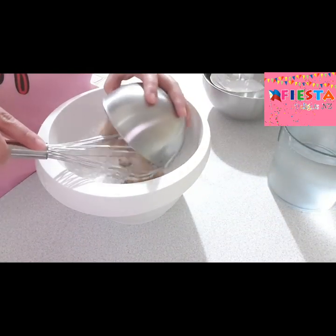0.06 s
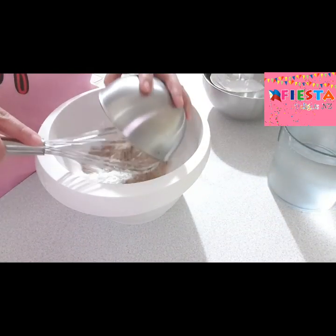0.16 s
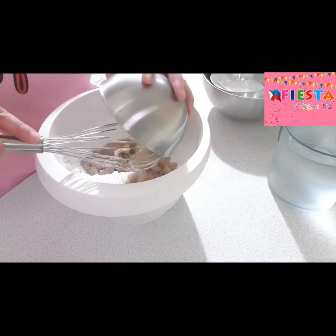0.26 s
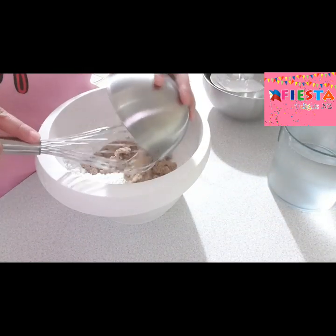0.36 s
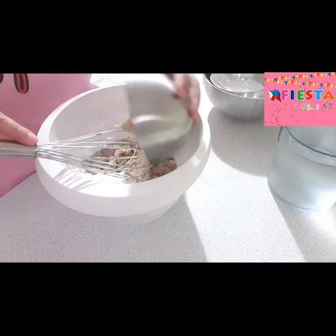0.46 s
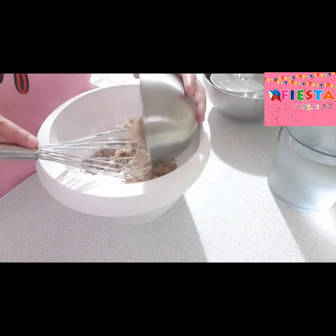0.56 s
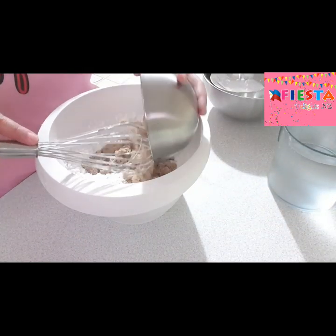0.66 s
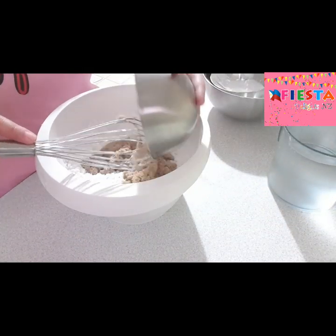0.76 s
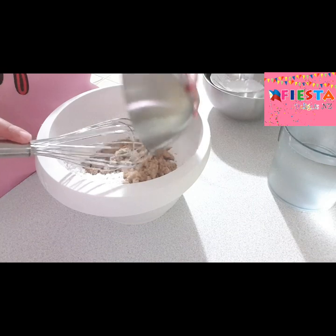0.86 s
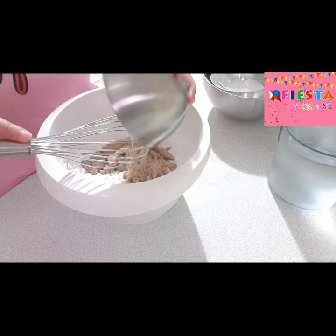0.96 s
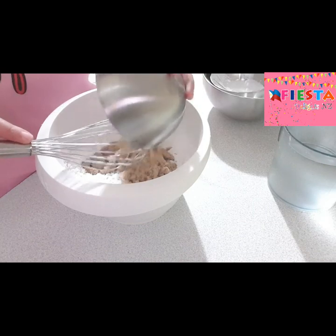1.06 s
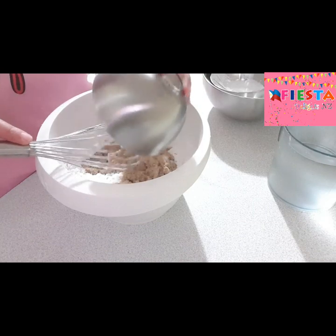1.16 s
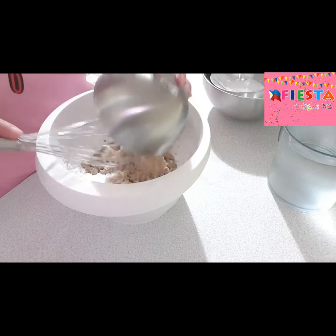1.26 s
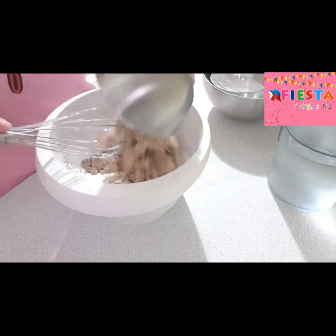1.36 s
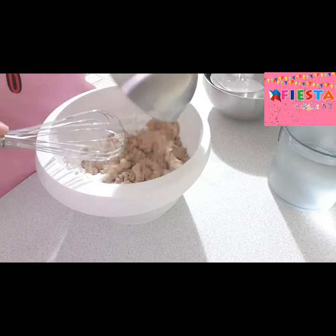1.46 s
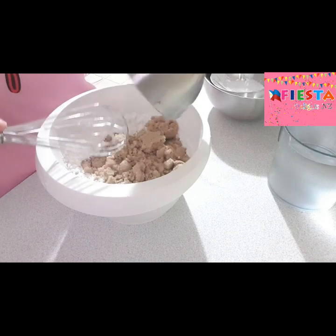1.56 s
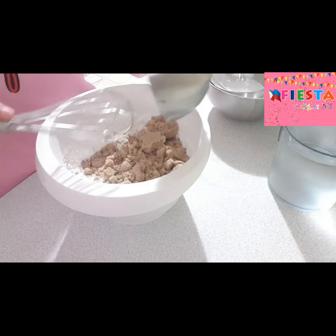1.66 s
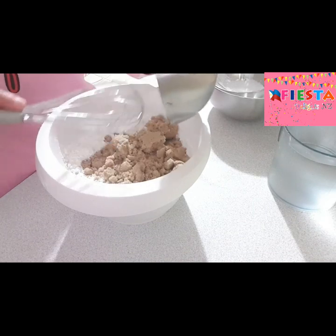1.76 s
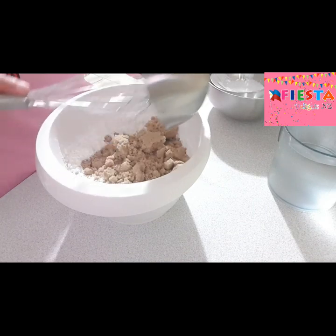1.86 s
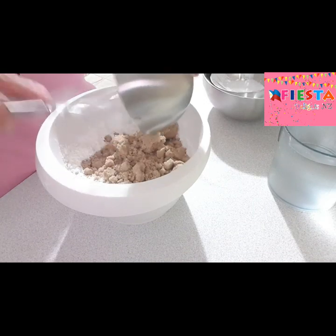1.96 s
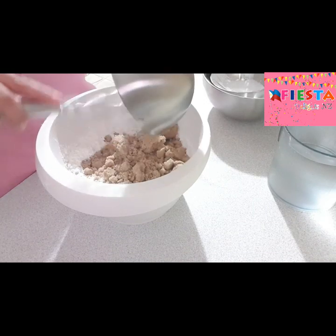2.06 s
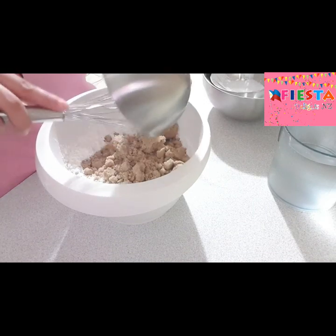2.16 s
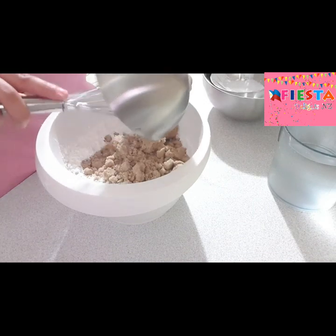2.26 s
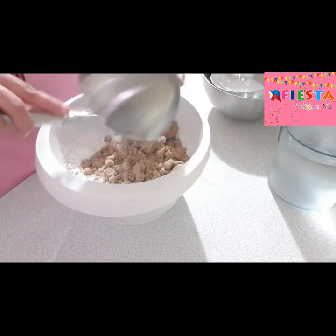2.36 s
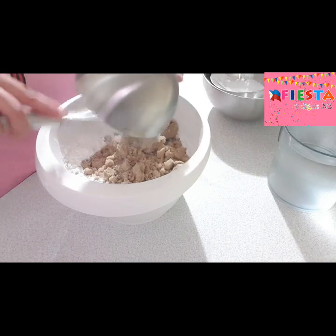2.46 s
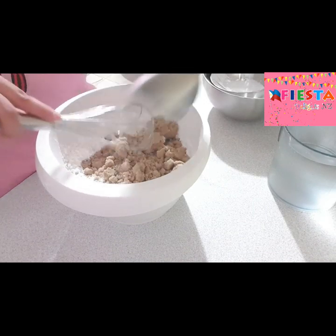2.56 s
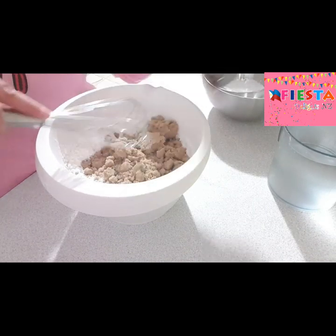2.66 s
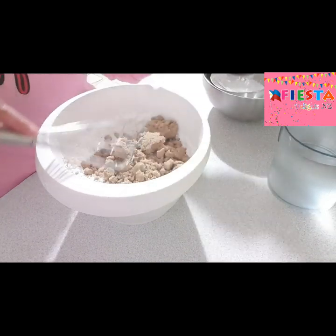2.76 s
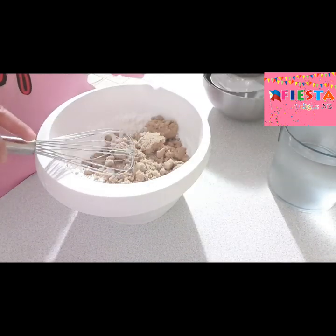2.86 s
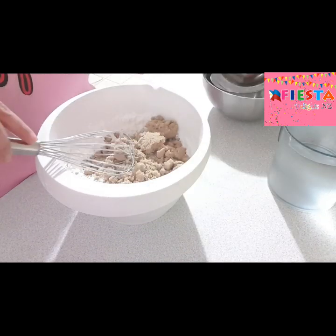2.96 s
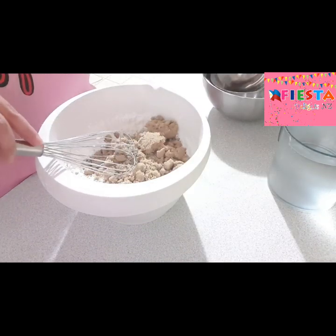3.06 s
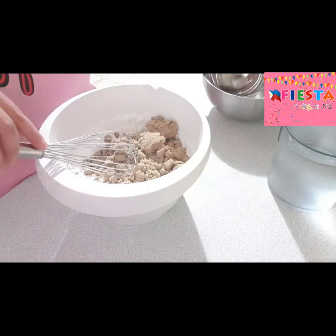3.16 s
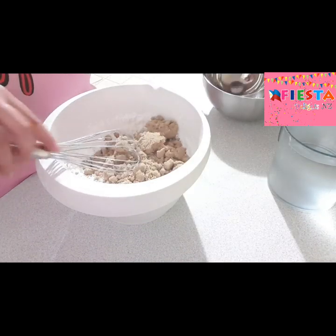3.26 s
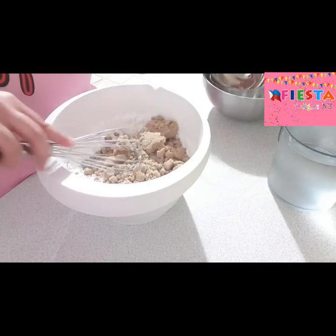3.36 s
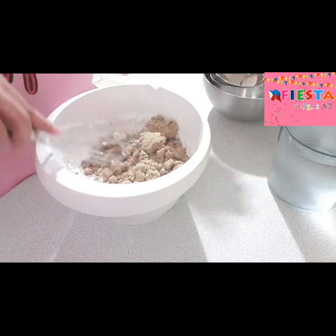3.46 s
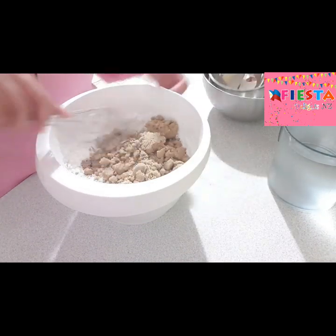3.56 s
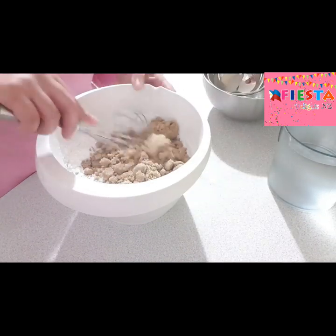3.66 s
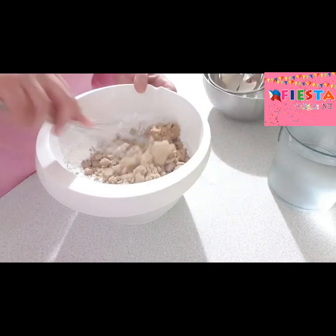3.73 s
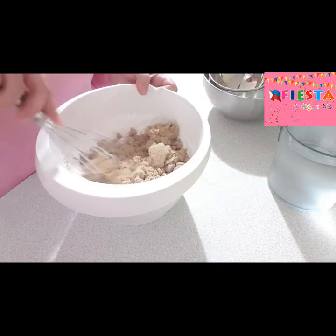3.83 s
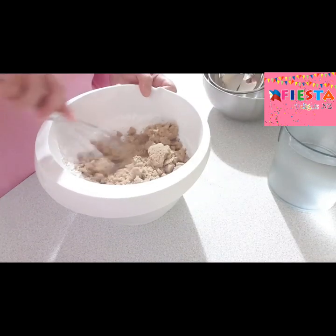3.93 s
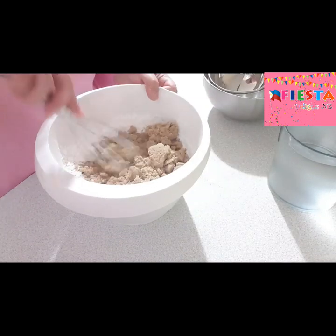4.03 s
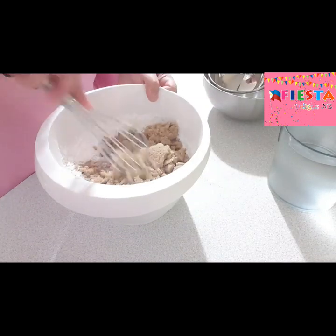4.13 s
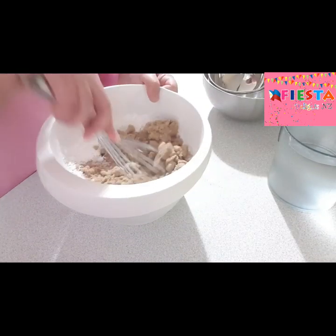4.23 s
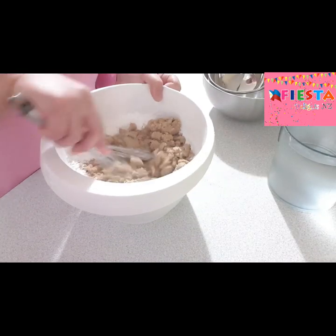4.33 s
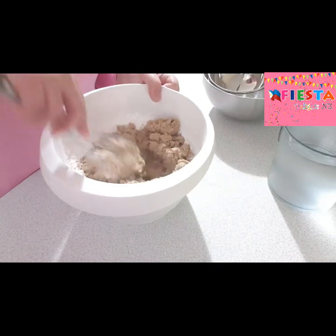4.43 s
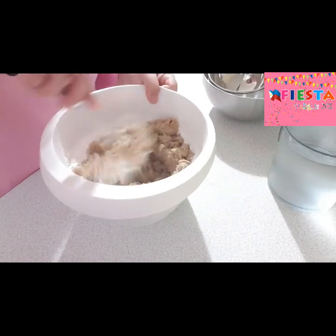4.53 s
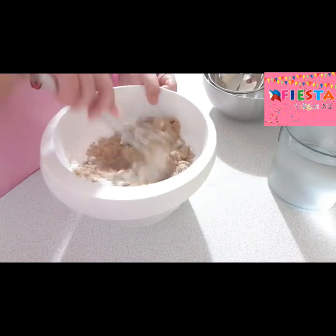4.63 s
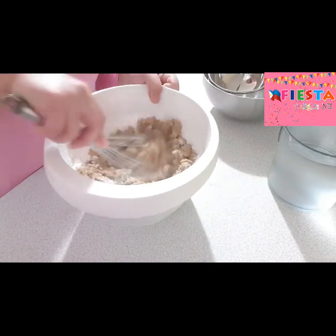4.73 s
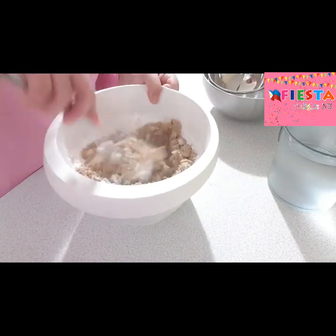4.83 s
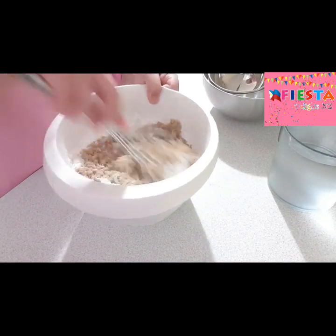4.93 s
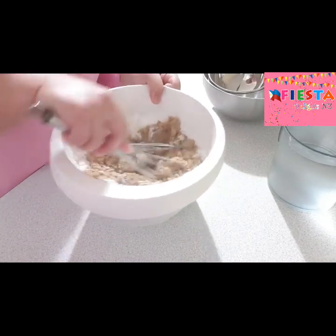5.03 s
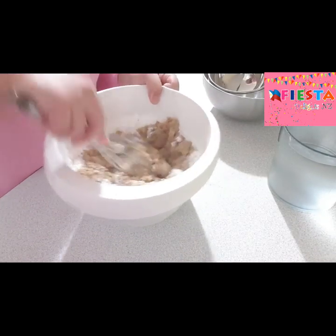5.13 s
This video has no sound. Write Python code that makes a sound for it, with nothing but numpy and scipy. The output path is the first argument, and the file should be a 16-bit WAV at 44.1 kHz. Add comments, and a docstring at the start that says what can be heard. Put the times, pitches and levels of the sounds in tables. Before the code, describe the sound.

Close kitchen sounds: trickling sugar, sharp whisk-on-steel clinks, a small metal bowl set down and slid, then soft gritty stirring with dull bumps.

```python
"""Sugar is heard first: hissing noise and random grains, as it is tipped from a small steel bowl into flour.
A wire whisk raps the steel bowl, among ticks and a few duller knocks: chattering contacts excite modes.
That bowl lands with a clatter and is pushed aside, its base groaning by stick-slip.
Then the whisk stirs the mix; a plastic mixing bowl bumps softly on the worktop throughout, as damped modes.
Faint squeaks are narrow noise bands; behind all lie dense reflections, low rumble, a fridge hum and room noise."""
import sys
import numpy as np
from scipy import signal
from scipy.fft import rfft, irfft
from scipy.io import wavfile
from scipy.ndimage import uniform_filter1d

SR = 44100
rng = np.random.default_rng(int(sys.argv[2]) if len(sys.argv) > 2 else 0)


def waveform_to_disk(signal):
    """Save audio, clipped to [-1, 1], as 16-bit WAV at the path in sys.argv[1]."""
    frames = np.transpose(np.atleast_2d(signal))
    scaled = np.clip(frames, -1, 1) * 32767
    samples = np.round(scaled).astype(np.int16)
    wavfile.write(sys.argv[1], SR, samples)


N = 228948
T = np.arange(N) / SR
RING_T = T[:SR // 2]   # time since a contact [s]


def from_db(db):
    """Logarithmic level: decibels become an amplitude ratio."""
    return 10 ** (np.asarray(db) / 20)


def rms_one(x):
    """Normalisation: scale to unit root-mean-square amplitude."""
    return x / np.sqrt(np.mean(x ** 2) + 1e-20)


def gains(rows, outside=None):
    """Amplitude envelope: one gain curve for each level column, linear in dB between the points."""
    times, *columns = np.transpose(rows)
    return [from_db(np.interp(T, times, levels, outside, outside)) for levels in columns]


def swells(spans, attack_s, release_s):
    """Power addition: overlapping spans rise and die away exponentially, and their powers add."""
    power = 0
    for s, length_s, db in spans:
        rise = 1 - np.exp(-np.maximum(T - s, 0) / attack_s)
        fall = np.exp(-np.maximum(T - s - length_s, 0) / release_s)
        power = power + (from_db(db) * rise * fall) ** 2
    return np.sqrt(power)


def colour(x, points):
    """Spectral shaping: gain interpolated in dB over log frequency."""
    hz, db = np.transpose(points)
    f = np.maximum(np.fft.rfftfreq(x.shape[-1], 1 / SR), 1)
    gain = from_db(np.interp(np.log(f), np.log(hz), db))
    return irfft(rfft(x) * gain, x.shape[-1])


def band(x, low, high):
    """Causal band-pass filtering."""
    return signal.sosfilt(signal.butter(2, [low, high], "band", fs=SR, output="sos"), x)


def two_ports(x, apart_hz=560):
    """Spatial coherence: two unrelated signals become a stereo pair that is alike in the bass only."""
    high_pass = signal.butter(2, apart_hz, "high", fs=SR, output="sos")
    side = signal.sosfilt(high_pass, x[1]) + from_db(-50) * x[1]
    return np.array([x[0] + side, x[0] - side])


def noise(points, size=N):
    """Broadband randomness: coloured stereo noise of unit rms."""
    return rms_one(colour(two_ports(rng.standard_normal((2, size))), points))


def unsteadiness(window, size=N):
    """Slow random fluctuation: noise averaged over a window [samples], unit rms."""
    return rms_one(uniform_filter1d(rng.standard_normal(size), size=window))


def grains(per_s, spread_db):
    """Shot noise: tiny random impacts of uneven size, unit rms."""
    hits = rng.random(N) < per_s / SR
    sizes = hits * from_db(spread_db * np.minimum(rng.exponential(1, N), 4))
    return rms_one(two_ports(sizes * rng.standard_normal((2, N))))


def ringing(modes, apart_hz=900, uneven_db=3.0, split=0.0016):
    """Modal superposition: decaying sines, each touch with random strengths and slight detuning."""
    out = 0
    for hz, db, t60 in modes:
        # high modes reach the two microphones out of step
        skew = rng.choice([-1, 1]) * rng.uniform(0.077, 1) * min(hz / apart_hz, 1) ** 2
        detuned_hz = hz * (1 + split * rng.normal())
        phase = 2 * np.pi * detuned_hz * RING_T + rng.integers(2) * np.pi
        decay = from_db(db + uneven_db * rng.normal() - 60 * RING_T / t60)
        out = out + np.sin(phase + skew * np.array([[1], [-1]])) * decay
    return rms_one(out)


def body(modes, points, crack_t60, ring_db):
    """Modal density: a crowd of short-lived modes merges into decaying noise, while a few ring on."""
    crack = noise(points, size=len(RING_T)) * from_db(-60 * RING_T / crack_t60)
    return rms_one(crack) + from_db(ring_db) * ringing(modes)


def add(out, s, sound):
    """Linear superposition: mix a sound in at a given time."""
    start = max(round(s * SR), 0)
    out[:, start:start + sound.shape[1]] += sound[:, :N - start]


def voiced(sound, bands, levels_db, attack_s):
    """Contact excitation: where and how hard a blow lands sets each register's strength in its attack."""
    out = 0
    for (low, high), db in zip(bands, levels_db):
        register = band(sound, low, high)
        out = out + from_db(db) * register / np.std(register[:, :int(attack_s * SR)])
    return out


# registers of a metal contact, as treble, low, body, upper middle: (lower edge [Hz], upper edge [Hz])
STEEL_BANDS = [(7000, 15000), (130, 600), (600, 2500), (2500, 7000)]


def clinks(rows, modes, points, crack_t60, ring_db, low_db, upper_db, chatter_db, contact_s,
           ping_db=0, ping_t60=None):
    """Repeated-contact excitation: metal touches chatter for a few milliseconds; some favour one mode."""
    out = np.zeros((2, N))
    for s, treble_db, body_db, *ping_hz in rows:
        sound = body(modes, points, crack_t60, ring_db)
        for hz in ping_hz:
            sound = sound + from_db(ping_db) * ringing([(hz, 0, ping_t60)])
        rebounds = unsteadiness(50, len(RING_T)) * np.exp(-RING_T / 0.014)
        contact = (1 - np.exp(-RING_T / contact_s)) * from_db(chatter_db * rebounds)
        # lows follow the body; the upper middle lies between body and treble
        levels_db = [treble_db, body_db + low_db, body_db, (treble_db + body_db) / 2 + upper_db]
        add(out, s, voiced(sound * contact, STEEL_BANDS, levels_db, attack_s=0.0076))
    return out


# sugar slides off the steel, past the wires and down the heap in small falls:
# (time [s], length [s], relative hiss level [dB], relative crunch level [dB])
FALLS = [(0.105, 0.092, -57.5, -63), (0.29, 0.083, -56.5, -69.5), (0.659, 0.2, -55.5, -69),
         (1.057, 0.2, -55.5, -66), (1.352, 0.32, -54.5, -72), (2.816, 0.031, -58.5, -97),
         (3.068, 0.32, -57, -80)]
# spectrum of the sugar hiss and of single crystals: (frequency [Hz], relative level [dB])
HISS_COLOUR = [(2060, -33), (3500, -8.5), (5470, -3.5), (6790, -1), (7790, 6.5), (8490, 1), (11500, 6),
               (12100, 0), (12700, -6), (13300, -36), (13700, -38)]
# spectrum of crunching lumps: (frequency [Hz], relative level [dB])
CRUNCH_COLOUR = [(320, -35), (550, -1.5), (1070, 6.5), (1470, -2), (2360, -6.5), (2650, -9.5), (3190, -3),
                 (3500, -29), (4550, -16), (7700, -120)]
FALL_ATTACK_S, FALL_RELEASE_S = 0.0067, 0.064   # time constants
# a thin trickle while the steel bowl is tipped; all levels here are relative
TRICKLE_UNTIL_S, TRICKLE_HISS_DB, TRICKLE_CRUNCH_DB = 1.8, -56, -74.5
REST_HISS_DB, REST_CRUNCH_DB = -59.5, -81       # faint floor that never stops
STIR_HISS_DB, STIR_CRUNCH_DB = -54, -68.5       # at 0 dB effort
FLOW_FLICKER_DB, FLOW_FLICKER_S = 1.4, 0.027    # rms unevenness, averaging window


def sugar(effort):
    """Granular flow: fine powder hisses, crystals prickle and lumps crunch, in trickle, falls and stirs."""
    tipped = np.exp(-np.maximum(T - TRICKLE_UNTIL_S, 0) / FALL_RELEASE_S)
    trickle_hiss = from_db(REST_HISS_DB + (TRICKLE_HISS_DB - REST_HISS_DB) * tipped)
    trickle_crunch = from_db(REST_CRUNCH_DB + (TRICKLE_CRUNCH_DB - REST_CRUNCH_DB) * tipped)
    hiss_spans = [(s, length_s, db) for s, length_s, db, _ in FALLS]
    crunch_spans = [(s, length_s, db) for s, length_s, _, db in FALLS]
    fall_hiss = swells(hiss_spans, FALL_ATTACK_S, FALL_RELEASE_S)
    fall_crunch = swells(crunch_spans, FALL_ATTACK_S, FALL_RELEASE_S)
    # powers of trickle, falls and stirs add
    hiss = np.linalg.norm([trickle_hiss, fall_hiss, from_db(STIR_HISS_DB) * effort], axis=0)
    crunch = np.linalg.norm([trickle_crunch, fall_crunch, from_db(STIR_CRUNCH_DB) * effort], axis=0)
    flow = from_db(FLOW_FLICKER_DB * unsteadiness(int(FLOW_FLICKER_S * SR)))
    crystals = rms_one(colour(grains(per_s=700, spread_db=3), HISS_COLOUR))
    lumps = rms_one(colour(grains(per_s=2500, spread_db=3), CRUNCH_COLOUR))
    powder = from_db(2.24) * noise(HISS_COLOUR) + from_db(-6) * crystals
    return flow * (hiss * powder + from_db(2.0) * crunch * lumps)


# whisk raps on the steel bowl: (time [s], treble level [dB], body level [dB])
RAPS = [(2.1182, -15, -27), (2.156, -17.5, -38), (2.1692, -18, -25), (2.1824, -12.5, -32.5),
        (2.1994, -21, -47), (2.212, -31, -64), (2.3345, -13, -23), (2.3684, -28, -42.5),
        (2.4925, -9.5, -22.5), (2.4985, -16, -24.5), (2.5695, -7.5, -23), (2.5745, -18, -25.5)]
# modes of the whisk wires: (frequency [Hz], relative level [dB], t60 [s])
WIRE_MODES = [(2030, -12, .22), (6299, -8, .22), (8038, -5, .18), (8374, -7, .16), (8630, -7, .16),
              (8813, -6, .16), (8968, -4, .16), (9345, -1, .2), (9822, -4, .18), (10073, -4, .16),
              (10297, 0, .18), (10824, 1, .2), (11105, 0, .18), (11320, -2, .16), (11510, -1, .2),
              (11645, -3, .16), (12000, -4, .16)]
# spectrum of a wire contact's short-lived modes: (frequency [Hz], relative level [dB])
RAP_COLOUR = [(130, -12), (320, -13), (435, 5.5), (580, -11.5), (1100, -17), (1650, -26.5), (2150, -13.5),
              (2800, -5.5), (4800, -15), (7000, -4.5), (8300, 8.5), (11200, 3.5), (12400, -1.5),
              (13700, -42)]


def whisk_raps():
    """Impact excitation: the wires chatter against the hand-held steel bowl and ring in their own modes."""
    return clinks(RAPS, WIRE_MODES, RAP_COLOUR, crack_t60=0.069, ring_db=-20.5, low_db=-7, upper_db=2.5,
                  chatter_db=1.0, contact_s=0.00049)


# the steel bowl knocks the rim once, later lands and rocks on its base:
# (time [s], relative treble level [dB], relative body level [dB], ping [Hz])
LANDINGS = [(2.2327, -44.5, -37.5, 1063), (3.2176, -20, -24.5, 5950), (3.2715, -26.5, -20, 2230),
            (3.2875, -15, -25, 5360), (3.2915, -32, -22, 5080), (3.3135, -18, -21.5, 2993),
            (3.3444, -46, -23.5, 601), (3.3824, -45, -27, 1850)]
# modes of the steel bowl: (frequency [Hz], relative level [dB], t60 [s])
STEEL_MODES = [(436, -6, .35), (757, -5, .16), (930, -4, .14), (954, -3, .28), (1026, -4, .2),
               (1308, -15, .3), (1840, -6, .16), (1937, -3, .18), (2074, -3, .18), (2136, -3, .18),
               (2187, -2, .28), (3012, 1, .13), (3079, 1, .12), (3124, -1, .12), (3418, -8, .15),
               (4021, -3, .1), (4170, -6, .1), (4823, -7, .12), (5148, 1, .1), (5295, 0, .13),
               (5615, -4, .12), (5850, 0, .08), (7600, -1, .08)]
# spectrum of a landing's short-lived modes: (frequency [Hz], relative level [dB])
LANDING_COLOUR = [(76, -29.5), (130, 7.5), (325, -31), (427, 10.5), (845, -4.5), (987, 2.5), (1490, -22.5),
                  (2150, 4.5), (2570, -10), (3060, 3.5), (3720, -8), (5180, -1.5), (11300, -4),
                  (12700, -16), (13700, -71)]


def bowl_landing():
    """Free vibration: knocked or let go, the steel bowl rings with its own modes."""
    clatter = clinks(LANDINGS, STEEL_MODES, LANDING_COLOUR, crack_t60=0.065, ring_db=-8.0, low_db=-9.5,
                     upper_db=3, chatter_db=1.0, contact_s=0.00053, ping_db=-6, ping_t60=0.048)
    return from_db(-1.5) * clatter


# the steel bowl slides over the worktop: (time [s], relative base level [dB], relative rasp level [dB])
SLIDE = [(3.51, -44, -62), (3.56, -52.5, -62), (3.62, -52.5, -58), (3.655, -47, -43.5), (3.676, -32.5, -38),
         (3.718, -42, -47.5), (3.77, -67, -84)]
# its base sticks and slips, faster as it goes: (time [s], mean slip rate [1/s])
JUDDER = [(3.56, 660), (3.68, 670), (3.76, 740)]
# modes of the juddering steel base: (frequency [Hz], relative level [dB], t60 [s])
GROAN_MODES = [(670, -1, 0.052), (753, 2, 0.05), (913, -5, 0.084)]
# spectrum of grit rasping under the base: (frequency [Hz], relative level [dB])
RASP_COLOUR = [(880, -54), (1500, -27.5), (1720, -1), (2340, -2), (2520, -37), (2760, 3.5), (3520, -38),
               (3650, -10.5), (4860, -7), (5330, 2.5), (8020, -11), (11000, 1), (12400, -7), (13300, -32),
               (13700, -72)]


def bowl_slide(rough=0.076):
    """Stick-slip friction: nearly regular slips make the base groan, while grit rasps on the shell."""
    base, rasp = gains(SLIDE, outside=-120)
    slip_rate = np.interp(T, *np.transpose(JUDDER)) * (1 + rough * unsteadiness(60))
    turns = np.cumsum(slip_rate) / SR
    slips = rms_one(np.diff(np.floor(turns), prepend=0))   # one impulse a slip
    grit = grains(per_s=3600, spread_db=1.5)
    drive = from_db(-6) * slips + grit
    groan = signal.fftconvolve(drive, ringing(GROAN_MODES), axes=1)[:, :N]
    shell = signal.fftconvolve(grit, ringing(STEEL_MODES), axes=1)[:, :N]
    scratch = rms_one(colour(grit, RASP_COLOUR)) + from_db(-12.5) * rms_one(shell)
    return from_db(2.5) * base * rms_one(groan) + from_db(3.5) * rasp * scratch


# the mixing bowl bumps on the worktop:
# (time [s], relative thud level [dB], relative wall level [dB], pitch [Hz])
BUMPS = [(0.318, -27.5, -36, 64), (0.344, -35, -47, 65.4), (0.847, -39.5, -63, 93), (0.934, -41.5, -66, 93),
         (1.209, -39.5, -43, 75.4), (1.508, -37.5, -57, 89), (1.613, -32, -39.5, 113),
         (2.681, -40, -53, 92.3), (3.008, -38, -41.5, 111), (3.269, -34.5, -60, 97),
         (3.35, -34, -30.5, 119), (3.49, -28.5, -22.5, 237), (3.6, -64, -38, 251), (3.786, -35, -30.5, 144),
         (3.812, -30.5, -44, 117.5), (3.915, -40.5, -38.5, 89), (3.993, -37, -41, 126),
         (4.227, -54, -46, 123), (4.372, -29.5, -40.5, 101), (4.401, -56, -38.5, 72),
         (4.516, -34.5, -39.5, 115), (4.786, -35.5, -41, 79), (5.125, -24.5, -25.5, 155),
         (5.139, -17.5, -25, 96.7)]
# modes of the plastic mixing bowl: (frequency [Hz], relative level [dB], t60 [s])
PLASTIC_MODES = [(77.2, 5, 0.071), (117.5, 3, 0.22), (208.6, -9.5, 0.23), (288.7, -14.5, 0.21),
                 (401.3, -6.5, 0.14), (445.5, -1.5, 0.064), (686, -16.5, 0.16), (758, -7.5, 0.1)]
# spectrum of a bump's short-lived modes: (frequency [Hz], relative level [dB])
BUMP_COLOUR = [(21, -35), (35, -16), (91, 8.5), (171, -8.5), (376, -12.5), (476, -6.5), (566, -20.5),
               (763, -16), (1500, -36), (1950, -65), (3300, -120)]
# registers of the plastic, as thud, wall, knock: (lower edge [Hz], upper edge [Hz])
PLASTIC_BANDS = [(35, 160), (160, 550), (550, 1200)]
BUMP_T60_S, KNOCK_BELOW_WALL_DB = 0.17, 21   # the same for every bump


def bowl_bumps(contact_s=0.00086):
    """Cushioned impact: soft blows of the plastic bowl, each favouring one mode by where it lands."""
    out = np.zeros((2, N))
    for s, thud_db, wall_db, hz in BUMPS:
        sound = body(PLASTIC_MODES, BUMP_COLOUR, crack_t60=0.15, ring_db=3)
        sound = sound + from_db(5.5) * ringing([(hz, 0, BUMP_T60_S)])
        cushioned = sound * (1 - np.exp(-(RING_T / contact_s) ** 2))
        levels_db = [thud_db, wall_db, wall_db - KNOCK_BELOW_WALL_DB]
        add(out, s, voiced(cushioned, PLASTIC_BANDS, levels_db, attack_s=0.034))
    return from_db(-6.0) * out


# turns of the whisk through the mix: (time [s], length [s], effort level [dB])
STIRS = [(4.03, 0.057, -5), (4.35, 0.095, -0.5), (4.76, 0.14, -3.5), (5.09, 0.12, 2)]


def whisk_effort():
    """Common excitation: one effort envelope drives sugar, wires and bowl on each turn of the whisk."""
    return swells(STIRS, attack_s=0.0054, release_s=0.1)


# spectrum of the mixing bowl's low murmur: (frequency [Hz], relative level [dB])
RUMBLE_COLOUR = [(15, -25), (25, -8), (60, -2), (107, 1), (123, -11), (151, -14), (188, -11.5),
                 (217, -24.5), (247, -13), (321, -21), (387, -17), (448, -18), (549, -36.5), (800, -28.5),
                 (1040, -105), (1760, -120)]
STIR_RUB_DB, STIR_WALL_DB, STIR_SHUDDER_DB = -64, -52.5, -49.5   # at 0 dB effort


def whisk_on_plastic(effort):
    """Friction excitation: wires rub along the wall, crumbs patter on it and the whole bowl shudders."""
    rub = rms_one(band(grains(per_s=2000, spread_db=1.0), 1900, 3300))
    crumbs = colour(grains(per_s=200, spread_db=1.0), BUMP_COLOUR)
    patter = rms_one(band(crumbs, *PLASTIC_BANDS[1]))
    shudder = noise(RUMBLE_COLOUR)
    touches = from_db(STIR_RUB_DB) * rub + from_db(STIR_WALL_DB) * patter
    return effort * (touches + from_db(STIR_SHUDDER_DB) * shudder)


# light ticks of wires and lumps, and a few duller, harder knocks:
# (time [s], relative treble level [dB], relative body level [dB], ping [Hz])
TICKS_AND_KNOCKS = [(0.1195, -42, -46, 7550), (0.169, -40, -66, 9260), (0.2, -58, -47.5, 1060),
                    (0.682, -36.5, -48, 6580), (0.8849, -32.5, -52, 10060), (1.3005, -39, -51.5, 11700),
                    (1.4208, -36, -50.5, 7300), (1.6038, -37.5, -49, 10400), (1.6312, -34.5, -56, 9360),
                    (2.9714, -36.5, -58, 11560), (3.0066, -51.5, -37, 2783), (3.4935, -77, -30.5, 770),
                    (3.7793, -42.5, -45.5, 7000), (3.9155, -68, -48, 750), (4.0377, -41.5, -42, 2630),
                    (4.2233, -43.5, -48, 2360), (4.4472, -36.5, -53.5, 9020)]


def ticks_and_knocks():
    """Selective modal excitation: light ticks and a few duller, harder knocks, each with one short ping."""
    contacts = clinks(TICKS_AND_KNOCKS, WIRE_MODES, RAP_COLOUR, crack_t60=0.1, ring_db=-19, low_db=-5.5,
                      upper_db=4, chatter_db=3.0, contact_s=0.00053, ping_db=-9.0, ping_t60=0.035)
    return from_db(-2) * contacts


# faint short squeaks: (time [s], relative level [dB], centre frequency [Hz])
SQUEAKS = [(0.01, -63.5, 3200), (0.223, -59.5, 3430), (0.599, -52.5, 3310), (1.082, -60, 4220),
           (1.345, -53, 3210), (2.01, -59, 2950), (3.19, -56.5, 2980), (4.0, -61, 2450),
           (4.23, -62.5, 2340), (4.715, -64, 3150), (4.77, -60.5, 2430), (5.11, -56.5, 2400)]


def squeaks():
    """Narrow-band noise: each squeak starts quickly and fades as a Gaussian."""
    out = np.zeros((2, N))
    swell = (1 - np.exp(-RING_T / 0.0044)) * np.exp(-(RING_T / 0.054) ** 2)
    for s, db, hz in SQUEAKS:
        rub = band(rng.standard_normal((2, len(RING_T))), hz - 200, hz + 200)
        add(out, s, from_db(db) * swell * rms_one(rub))
    return from_db(0.5) * out


# the room's share of each frequency: (frequency [Hz], level [dB])
ROOM_COLOUR = [(60, -17.5), (300, -5.5), (1000, -9), (3000, -4), (6000, -8.5), (11000, -15)]


def kitchen(x, t60=0.31, build_s=0.0009):
    """Diffuse reverberation: dense reflections from near walls and cupboards decay exponentially."""
    tail = two_ports(rng.standard_normal((2, len(RING_T))))
    tail = colour(tail, ROOM_COLOUR) / np.std(tail)
    fade = from_db(-60 * RING_T / t60) * (1 - np.exp(-RING_T / build_s))
    return signal.fftconvolve(x, tail * fade / np.linalg.norm(fade), axes=1)[:, :N]


# the mixing bowl rumbles under the hands: (time [s], relative level [dB])
HANDLING = [(0.0, -48.5), (0.29, -53.5), (1.6, -52), (1.94, -50.5), (2.96, -62.5), (3.48, -54),
            (4.45, -56.5), (5.19, -50)]
# a fridge motor hums nearby: (frequency [Hz], relative level [dB])
HUM = [(98.2, -82), (245.5, -67.5), (294.6, -67.5), (393, -61.5), (491.2, -69.5)]


def rumble():
    """Stationary background: a steady harmonic hum and faint room noise under the handled bowl's murmur."""
    level, = gains(HANDLING)
    hum = 0
    for hz, db in HUM:
        hum = hum + from_db(db) * np.sqrt(2) * np.sin(2 * np.pi * (hz * T + rng.random()))
    air = from_db(-74.5) * noise([(500, -23), (1500, 1.5), (4000, 0), (10000, -7)])
    return from_db(2.0) * level * noise(RUMBLE_COLOUR) + from_db(-6) * hum + air


def scene():
    """Superposition of direct sound, its reverberation and the background."""
    effort = whisk_effort()
    blows = whisk_raps() + bowl_landing() + ticks_and_knocks() + bowl_bumps()
    direct = blows + bowl_slide() + sugar(effort) + whisk_on_plastic(effort) + squeaks()
    return direct + kitchen(direct) + rumble()


# how much the two microphones differ: (frequency [Hz], gain of the side signal [dB])
PORT_SPREAD = [(100, 4), (280, -3.5), (550, -1), (1000, 1.5), (2200, 0), (8000, 0), (12000, 0.5)]
# balance of the two microphones: (frequency [Hz], left minus right [dB])
PORT_BALANCE = [(60, 1.5), (250, 5), (600, 7), (1200, -1), (3000, -0.5), (5000, -1.5), (8500, -2.5),
                (12000, -6)]


def record(dry):
    """Band-limited, saturating reception: left fuller, right brighter, peaks rounded, deep bass and top cut."""
    mid = (dry[0] + dry[1]) / 2
    side = colour((dry[0] - dry[1]) / 2, PORT_SPREAD)
    left = colour(mid + side, [(hz, db / 2) for hz, db in PORT_BALANCE])
    right = colour(mid - side, [(hz, -db / 2) for hz, db in PORT_BALANCE])
    high_pass = signal.butter(3, 44, "high", fs=SR, output="sos")
    thinned = signal.sosfilt(high_pass, [left, right])
    rounded = .85 * np.tanh(thinned / .85)
    low_pass = signal.butter(20, 13000, fs=SR, output="sos")
    return signal.sosfilt(low_pass, rounded)


dry = scene()
out = record(dry)
waveform_to_disk(out)
```